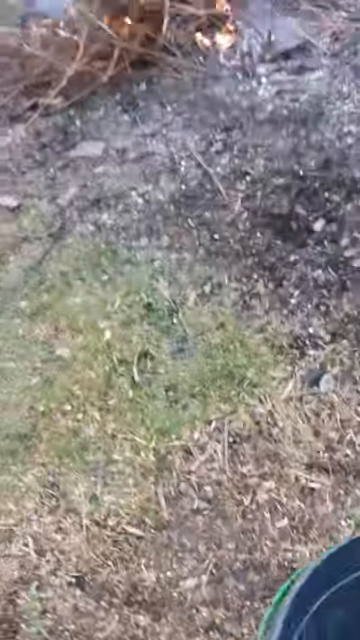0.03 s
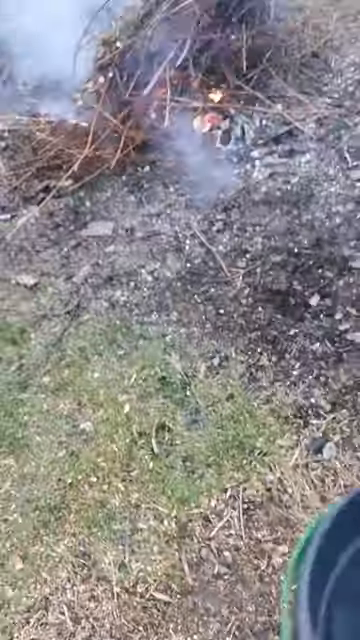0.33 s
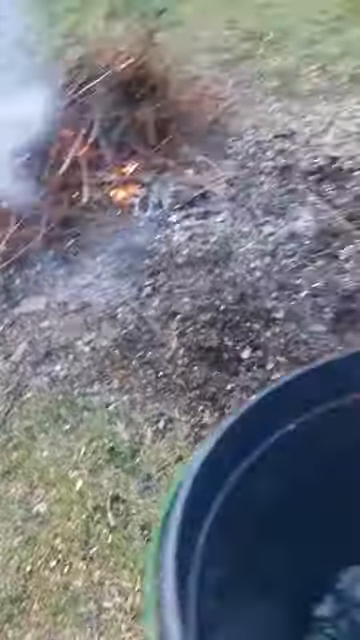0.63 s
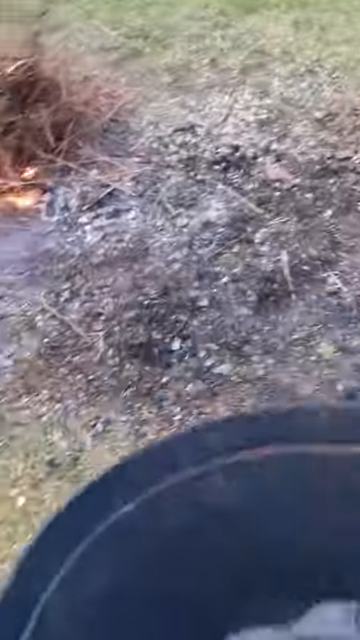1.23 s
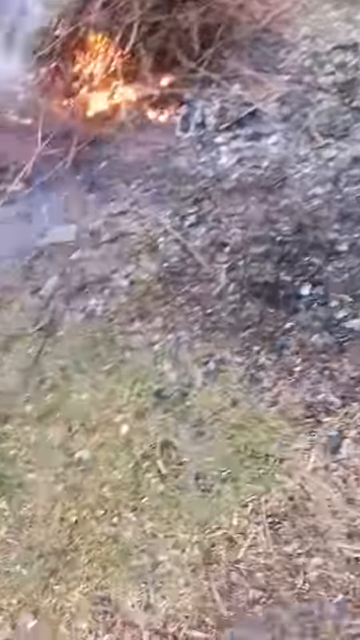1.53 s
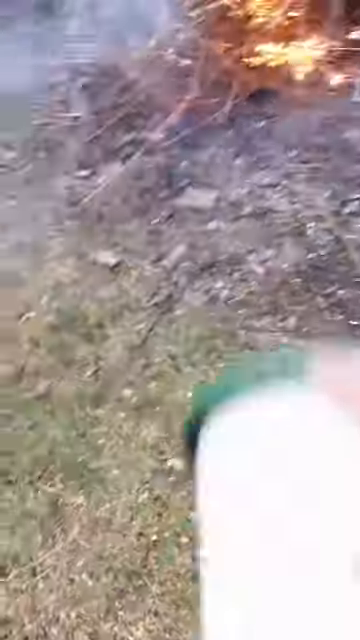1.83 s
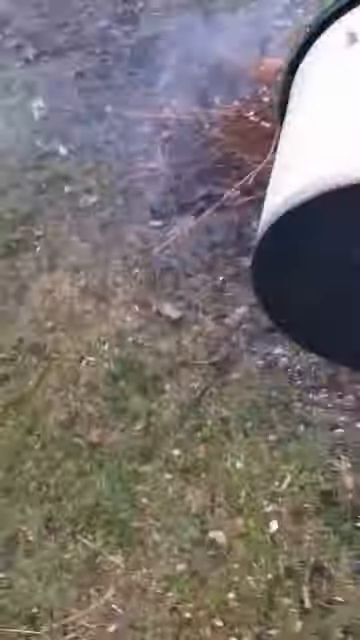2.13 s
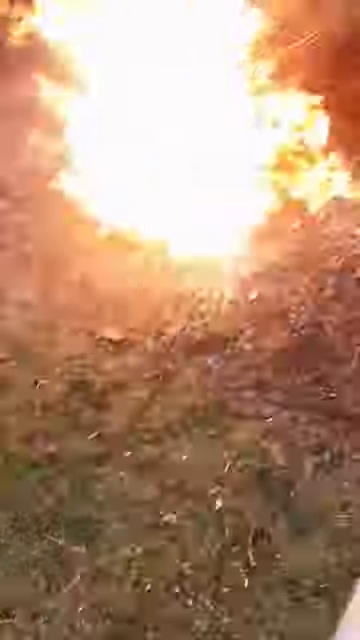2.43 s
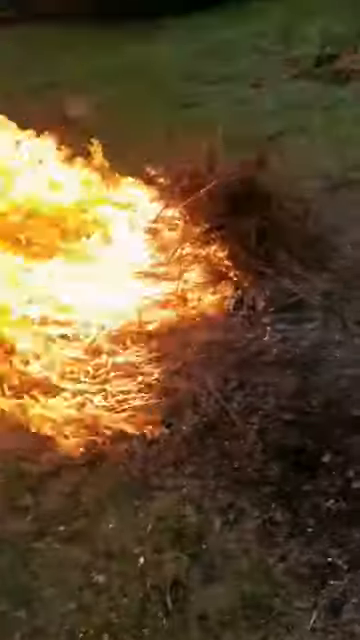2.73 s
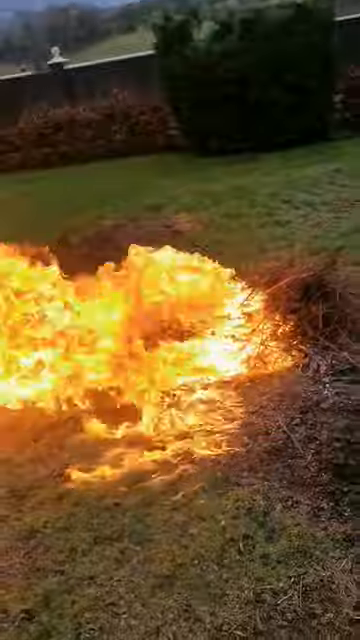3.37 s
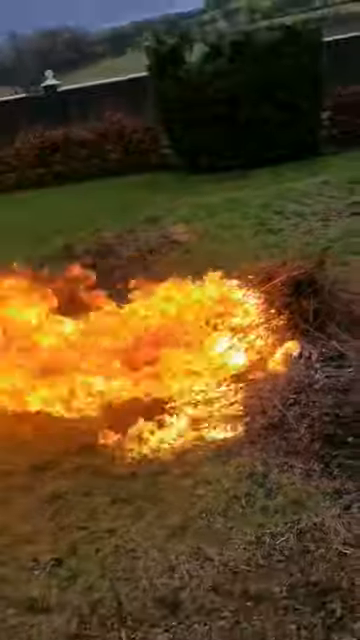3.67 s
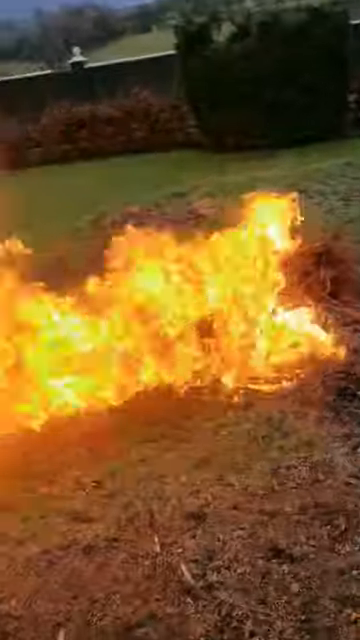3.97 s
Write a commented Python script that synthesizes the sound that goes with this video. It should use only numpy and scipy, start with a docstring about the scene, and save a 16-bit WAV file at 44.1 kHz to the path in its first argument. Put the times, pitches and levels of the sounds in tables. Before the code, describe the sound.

Gusty wind rumbles on the microphone as a crackling fire flares up with a whoosh.

```python
"""Wind, the swing of a throw and the draught of a fireball buffet two microphone ports, each on its own:
the faster the air, the louder and brighter the rumble. Under it a brush pile smoulders and snaps;
fuel thrown on it sizzles, catches with a whoosh and roars into the right port. Bucket clacks, footwork
and an open-air bed fill in the scene. Every layer is coloured noise shaped by an envelope."""
import sys
import numpy as np
from scipy import signal
from scipy.fft import rfft, irfft, next_fast_len
from scipy.io import wavfile
from scipy.ndimage import uniform_filter1d, minimum_filter1d, map_coordinates

SR = 44100
rng = np.random.default_rng(int(sys.argv[2]) if len(sys.argv) > 2 else 0)


def to_wav(sig):
    """Store sig (one row per channel, or 1-D mono) as 16-bit WAV at the path in sys.argv[1].

    Samples outside -1..1 are clipped; the rate is SR.
    """
    pcm = np.clip(np.atleast_2d(sig), -1, 1) * 32767
    pcm = np.round(pcm).astype(np.int16)
    wavfile.write(sys.argv[1], SR, pcm.T)  # frames by channels


N = 176400

# Levels are faders ahead of each layer's trim and pan; EQs are relative; pan is left minus right.
# open-air bed: t/s, level/dB
BED_FADER = [(0, -52), (.2, -51.5), (.45, -51.5), (.7, -55), (1.05, -57.5), (1.4, -53), (2, -48),
             (3, -45.5), (4, -45.5)]
# its soft low-mid wash: f/Hz, gain/dB
BED_EQ = [(100, 1), (400, 12.5), (900, -5), (1700, -2.5), (3000, -11), (6000, -14.5), (15000, -55)]
# grass underfoot: t/s, level/dB
GRASS_FADER = [(0, -52), (.08, -52), (.22, -60.5), (.33, -54.5), (.45, -51), (.55, -71), (.9, -80)]
# its papery mids: f/Hz, gain/dB
GRASS_EQ = [(500, -11), (1200, -4.5), (1700, -1), (2800, -7), (3800, -10), (8000, -19)]
# scuffs on the ground: t/s, level/dB, rise/s, fall/s
SCUFF_CUES = [(0.384, -34.5, 0.011, 0.0099), (.39, -55.5, 0.076, 0.18), (0.648, -47.5, .004, 0.0043),
              (1.315, -48.5, 0.023, 0.0098)]
# their grit: f/Hz, gain/dB
SCUFF_EQ = [(300, -13), (1200, -9), (2200, -2), (3500, -5), (5500, -3), (8000, -13), (15000, -14.5)]
# clacks of the bucket: t/s, level/dB
CLACK_CUES = [(.005, -21.5), (.018, -23)]
# its broad resonances: f/Hz, gain/dB
BUCKET_EQ = [(300, -29), (700, -22), (950, 3), (1300, -21), (1650, -6), (1900, 12.5), (2250, -2),
             (2900, -15), (3650, -3.5), (4300, -6), (5000, -18), (5700, -20), (9000, -26), (15000, -23)]
# hot twigs and fuel: t/s, level/dB
SIZZLE_FADER = [(0,-63), (.12,-70), (.39,-73), (.56,-65.5), (.93,-72), (1.12,-71), (1.3,-60.5), (1.45,-71),
                (1.56,-59), (1.69,-57), (1.8,-59), (1.9,-54), (2.0,-48.5), (2.07,-51), (2.13,-57.5),
                (2.25,-62.5), (2.33,-57.5), (2.45,-52), (2.53,-56), (2.74,-59), (2.88,-70), (3.05,-66.5),
                (3.19,-54), (3.32,-56), (3.39,-50), (3.49,-53.5), (3.58,-52.5), (3.64,-64.5), (3.77,-61),
                (4,-60.5)]
# their sizzling top end: f/Hz, gain/dB
SIZZLE_EQ = [(1880, -36), (3200, -3), (5910, -0.5), (6400, -1), (6940, 3), (7530, -4.5), (9920, -2.5),
             (10500, 0), (13000, 0), (16000, -5)]
# snaps of wood: t/s, level/dB, pan/dB, body send/dB
SNAP_CUES = [(0.6921,-13.5,-1,-23), (1.216,-18,5,-22), (1.297,-30.5,-2,-19), (1.311,-31,-2,-13),
             (1.514,-34,-2,-25), (1.535,-30,-4,-24), (1.5605,-28,-4,-22), (1.572,-20,-3,-24),
             (1.589,-13.5,-6,-11.5), (1.599,-25,-17,-35), (1.677,-28.5,-20,-18), (1.736,-20,-10,-35),
             (1.845,-23.5,-8,-30), (1.9,-19,-14,-20), (1.98,-25.5,-13,-14), (2.029,-20,-2,-20.5),
             (2.103,-30,-13,-18), (2.209,-25,-10,-19), (2.2603,-15,-5,-27), (2.3386,-18.5,-5,-13),
             (2.4153,-20,0,-30), (3.261,-24.5,3,-21), (3.3318,-20,-3,-24), (3.3795,-21,-4,-26),
             (3.395,-22,-4,-20), (3.583,-27,-7,-12.5), (3.6347,-23.5,-4,-19), (3.68,-30,-10,-22),
             (3.8352,-16,-2,-11.5), (3.903,-28.5,-3,-22), (3.9725,-37.5,-9,-3.5)]
# a snap's bright crack: f/Hz, gain/dB
CRACK_EQ = [(1000, -20), (4000, -12), (7000, -0.5), (9000, -0.5), (12000, 3.5), (16000, 1)]
# its fuller body: f/Hz, gain/dB
BODY_EQ = [(400, -37), (1500, -6.5), (4000, -1), (6500, 4), (10000, -12)]
# whoosh of the vapour catching: f/Hz, gain/dB
FLARE_EQ = [(200, -23), (700, -4), (1900, 1), (3200, -9.5), (6000, -10.5), (9000, -12), (15000, -19)]
# roar of the fireball's draught: f/Hz, gain/dB
ROAR_EQ = [(60, -26), (170, -2.5), (400, 2), (680, 3), (900, -2.5), (1250, -9), (1800, -16), (2500, -20),
           (3500, -35.5), (5000, -49), (7000, -57), (10000, -66)]
# its ragged upper edge: f/Hz, gain/dB
TEAR_EQ = [(600, -17), (2000, 0.5), (3500, -4.5), (5000, -9.5), (7000, -17), (8500, -34), (15000, -45)]
# single eddies hitting a port: t/s, level/dB, pan/dB
THUMP_CUES = [(0.621,-24,-27), (0.873,-15.5,-40), (0.924,-20,-32), (1.037,-24,-26), (1.1,-19.5,-35),
              (1.415,-19.5,-32), (1.866,-14,-36), (1.953,-19,-34), (2.112,-4,-29), (2.131,-6.5,-25),
              (2.444,-13.5,34), (3.119,-18,10), (3.595,-7,-20), (3.658,-6.5,-8), (3.697,-9,-1)]
# their dull puff: f/Hz, gain/dB
THUMP_EQ = [(50, -15), (150, -3), (400, 2.5), (700, -4.5), (1000, -22), (1600, -37), (3000, -52),
            (6000, -85), (16000, -120)]
# air at the left port: t/s, level/dB, corner f/Hz
LEFT_GUSTS = [(0.005, -20, 139), (0.025, -19, 70), (0.065, -37, 90), (0.165, -12.5, 130),
              (0.415, -49.5, 69), (0.505, -18.5, 85), (0.675, -34, 120), (0.785, -19, 60),
              (0.905, -39.5, 92), (1.255, -43, 120), (1.305, -22, 130), (1.335, -37, 90),
              (1.715, -30.5, 110), (1.765, -13.5, 78.5), (1.885, -38, 120), (1.925, -9, 81),
              (1.985, -41, 110), (2.075, -10.5, 188), (2.185, -17, 211), (2.235, -15, 470),
              (2.285, -7, 360), (2.385, -28.5, 99), (2.435, -14, 270), (2.505, -9, 400),
              (2.605, -13.5, 215), (2.695, -15, 336), (2.755, -25, 210), (2.835, -22, 398),
              (2.865, -14.5, 240), (3.005, -25, 270), (3.035, -28, 110), (3.135, -15, 640),
              (3.165, -22.5, 290), (3.245, -12.5, 387), (3.345, -15, 170), (3.435, -6, 242),
              (3.475, -29, 170), (3.495, -14.5, 296), (3.565, -11, 216), (3.685, -9.5, 440),
              (3.725, -27, 180), (3.785, -8, 192), (3.805, -22.5, 140), (3.845, -7.5, 320),
              (3.885, -8, 510), (3.995, -33, 90)]
# air at the right port: t/s, level/dB, corner f/Hz
RIGHT_GUSTS = [(.005,-28,150), (.035,-23,118), (.135,-42,50), (.275,-27.5,126), (.335,-52,70),
               (.455,-45,150), (.515,-28.5,84.5), (.665,-12.5,238), (.755,-26,196), (.805,-14,255),
               (.87,-13.5,253), (.975,-15,252), (1.005,-29,232), (1.035,-13,260), (1.065,-25,268),
               (1.105,-16.5,280), (1.175,-18,197), (1.235,-29.5,180), (1.325,-20,156), (1.515,-13.5,253),
               (1.615,-17,328), (1.695,-16.5,226), (1.735,-25.5,164), (1.825,-16.5,167), (1.855,-14,430),
               (1.995,-13.5,406), (2.045,-23,200), (2.09,-14,270), (2.12,-6,676), (2.155,-11.5,400),
               (2.22,-18,292), (2.355,-29,149), (2.415,-45,50), (2.525,-17,227), (2.672,-17.5,209),
               (2.69,-13,640), (2.75,-9,630), (3.005,-13,765), (3.065,-19.5,473), (3.135,-18,440),
               (3.185,-34,180), (3.255,-35,128), (3.305,-21.5,530), (3.355,-26,248), (3.38,-10.5,600),
               (3.435,-14.5,444), (3.475,-30,230), (3.51,-30,170), (3.535,-9.5,680), (3.575,-16.5,463),
               (3.597,-8.5,760), (3.63,-23,597), (3.648,-15,510), (3.695,-11,610), (3.765,-26.5,216),
               (3.795,-14.5,377), (3.835,-36,182), (3.865,-15,340), (3.905,-25,250), (3.975,-19.5,230),
               (3.995,-15.5,495)]
# eddies before the corner takes their treble: f/Hz, gain/dB
EDDY_EQ = [(10, -8.5), (25, -4.5), (70, 0), (140, -1), (300, -1.5), (480, -1.5), (750, -3.5), (1300, -7.5),
           (2300, 1.5), (4000, -8.5), (9000, 6.5)]


def amp(db):
    """Decibels to linear gain."""
    return np.exp(np.asarray(db) * np.log(10) / 20)


def unit(x):
    """Normalise to rms 1."""
    return x / np.sqrt(np.mean(x ** 2) + 1e-20)


def eq_db(eq, hz):
    """Gain of an EQ curve, drawn on a log frequency axis."""
    f, db = np.transpose(eq)
    return np.interp(np.log(hz + 1), np.log(f + 1), db)


def automation(rows):
    """One lane of per-sample values for each column after the time."""
    s, *lanes = np.transpose(rows)
    return [np.interp(np.arange(N) / SR, s, lane) for lane in lanes]


def wobble(rate):
    """A smooth random modulator, rate knots a second."""
    at = np.arange(0, N, 16)
    curve = map_coordinates(rng.standard_normal(4096), [at * rate / SR], mode="wrap")
    return np.interp(np.arange(N), at, curve)


def filtered(x, response):
    """Apply a gain given as a function of frequency."""
    size = next_fast_len(N + 8192)
    return irfft(rfft(x, size) * response(np.fft.rfftfreq(size, 1 / SR)), size)[..., :N]


def pan(side_db):
    """Left and right gains for a level difference."""
    gains = amp(np.array([[side_db], [-side_db]]) / 2)
    return gains / gains.mean()


def noise(eq, shared=0.35):
    """Coloured stereo noise of rms 1, partly common to both sides."""
    white = rng.standard_normal((3, N))
    return unit(filtered(white[:2] + shared * white[2], lambda hz: amp(eq_db(eq, hz))))


def outdoors():
    """The faint wash of the open air."""
    level_db, = automation(BED_FADER)
    return amp(level_db) * noise(BED_EQ) * pan(side_db=-4)


def rustle():
    """Feet shift in the grass with a fluttering swish."""
    level_db, = automation(GRASS_FADER)
    return amp(level_db + 2.9 * wobble(rate=72)) * noise(GRASS_EQ) * pan(side_db=-6.5)


def scuffs():
    """Short grainy scrapes of feet on gritty ground."""
    t = np.arange(N) / SR
    pressure = sum(amp(db) * np.exp(-np.abs(t - s) / np.where(t < s, rise, fall))
                   for s, db, rise, fall in SCUFF_CUES)
    grain = amp(2.7 * wobble(rate=400))
    return pressure * grain * noise(SCUFF_EQ) * pan(side_db=-6)


def bucket(t60_s=0.034):
    """The handled bucket gives two quick dull clacks."""
    t = np.arange(N) / SR
    knocks = sum((t > s) * amp(db - 60 * np.abs(t - s) / t60_s) for s, db in CLACK_CUES)
    return knocks * noise(BUCKET_EQ) * pan(side_db=-14.5)


def sizzle(hiss_db=2.5, crackle_db=4, sparks_per_s=400, spread_db=3, decay_s=0.0024):
    """Hot twigs and fuel hiss, dotted with tiny crackles."""
    level_db, = automation(SIZZLE_FADER)
    eq = [(500, -35), (2000, -9)] + list(SIZZLE_EQ[1:])  # low cut, then the top end
    triggers = rng.random(N) < sparks_per_s / SR
    sparks = triggers * amp(spread_db * np.minimum(rng.exponential(size=N), 4))
    bursts = unit(signal.lfilter([1], [1, -np.exp(-1 / (decay_s * SR))], sparks))
    hiss = amp(hiss_db + 0.47 * wobble(rate=23.74)) * noise(eq)
    crackle = amp(crackle_db) * bursts * noise(eq)
    return amp(level_db) * (hiss + crackle) * pan(side_db=-5.5)


def snaps(attack_s=0.00064, t60_s=0.011, tail_t60_s=0.072, tail_db=-29, crack_db=-4.5, body_db=8):
    """Wood bursts: a short crack, bright or fuller, and a faint answer from the garden."""
    crack, body = np.zeros((2, 2, 2 * N))
    t = np.arange(SR // 4) / SR
    decay = amp(-60 * t / t60_s) + amp(tail_db - 60 * t / tail_t60_s)
    envelope = (1 - np.exp(-t / attack_s)) * decay
    for s, db, side_db, send_db in SNAP_CUES:
        at = slice(round(s * SR), round(s * SR) + len(t))
        hit = amp(db) * pan(side_db) * envelope
        crack[:, at] += amp(crack_db) * hit
        body[:, at] += amp(body_db + send_db) * hit
    return crack[:, :N] * noise(CRACK_EQ, shared=0.31) + body[:, :N] * noise(BODY_EQ, shared=0.6)


def flare(peak_s=2.566, rise_s=0.096, fall_s=0.18, level_db=-38):
    """The vapour catches in one soft whoosh that swells and sinks."""
    t = np.arange(N) / SR - peak_s
    swell = np.where(t < 0, np.exp(-(t / rise_s) ** 2), np.exp(-np.abs(t) / fall_s))
    return amp(level_db + 0.77 * wobble(rate=28.34)) * swell * noise(FLARE_EQ) * pan(side_db=-3)


def fireball(start_s=2.683, end_s=3.01, attack_s=0.0024, release_s=0.0083, trim_db=-15, tear_db=-29):
    """The draught slams the right port: a roar with a tearing edge that builds, then drops away."""
    t = np.arange(N) / SR
    attack = 1 - np.exp(-np.maximum(t - start_s, 0) / attack_s)
    release = np.exp(-np.maximum(t - end_s, 0) / release_s)
    surge_db = 3 * np.clip((t - start_s) / (end_s - start_s), 0, 1)
    roar = amp(1.8 * wobble(rate=160)) * noise(ROAR_EQ, shared=0)
    tear = amp(tear_db + surge_db + 4.5 * wobble(rate=450)) * noise(TEAR_EQ, shared=0)
    return attack * release * amp(trim_db + surge_db) * (roar + tear) * pan(side_db=-34) / 2


def thumps(width_s=0.0035):
    """Single strong eddies strike a port with a short dull puff."""
    t = np.arange(N) / SR
    push = sum(amp(db) * pan(side_db) / 2 * np.exp(-np.abs(t - s) / width_s)
               for s, db, side_db in THUMP_CUES)
    return push * noise(THUMP_EQ, shared=0)


def buffet(gusts, trim_db, bass_db, bass_hz=110, churn_db=1.9, churn_octaves=0.18, flutter_db=2.53):
    """Eddies on one port die off above a corner: faster air lifts the level and the corner together."""
    level_db, octaves = automation([(s, db, np.log2(hz)) for s, db, hz in gusts])
    churn = wobble(rate=190)
    corner_hz = 2 ** (octaves + churn_octaves * churn)
    hz = np.fft.rfftfreq(N, 1 / SR)
    shelf_db = bass_db / (1 + (hz / bass_hz) ** 2)
    eddies = rfft(rng.standard_normal(N)) * amp(eq_db(EDDY_EQ, hz) + shelf_db)
    centres_hz = np.geomspace(40, 7000, 14)
    rumble = np.zeros(N)
    for centre in centres_hz:
        band = irfft(eddies * np.interp(hz, centres_hz, centres_hz == centre), N)
        rolloff_db = np.minimum(11.5 * (centre / corner_hz) ** 1.017, 100)
        rumble += band * amp(flutter_db * wobble(rate=45) - rolloff_db)  # each band flutters alone
    # flatten the rumble, then ride it with the gusts
    power = np.abs(uniform_filter1d(uniform_filter1d(rumble ** 2, SR // 30), SR // 30))
    return rumble / np.sqrt(power + 1e-12) * amp(level_db + trim_db + churn_db * churn)


def scene():
    """The mix: wind on both ports over the fire, the foley and the garden."""
    left = buffet(LEFT_GUSTS, trim_db=0, bass_db=4.5)
    right = buffet(RIGHT_GUSTS, trim_db=0.74, bass_db=-3.5)
    air = np.array([left, right]) + thumps() + fireball()
    fire = sizzle() + snaps() + flare()
    foley = bucket() + scuffs() + rustle()
    return air + fire + foley + outdoors()


def record(dry, high_cut_hz=16100):
    """Master chain: a limiter on each side, then a brick-wall high cut."""
    safe_gain = 1 / np.maximum(np.abs(dry), 1)
    gain = uniform_filter1d(minimum_filter1d(safe_gain, SR // 50), SR // 100)
    return filtered(dry * gain, lambda hz: hz < high_cut_hz)


dry = scene()
out = record(dry)
to_wav(out)
```